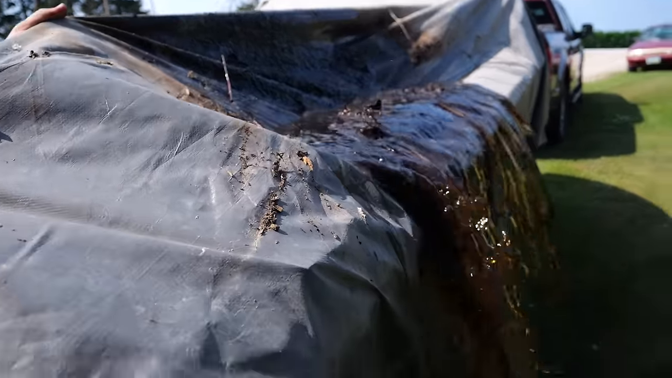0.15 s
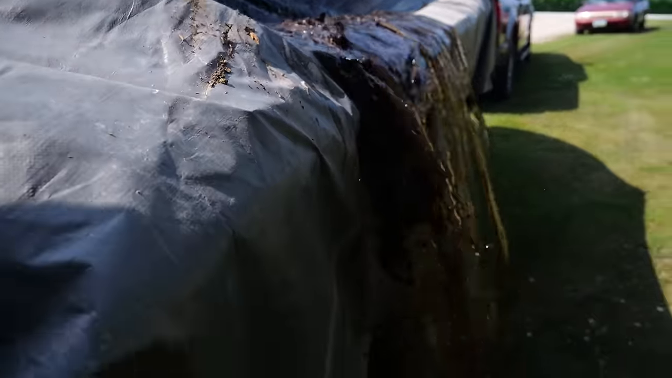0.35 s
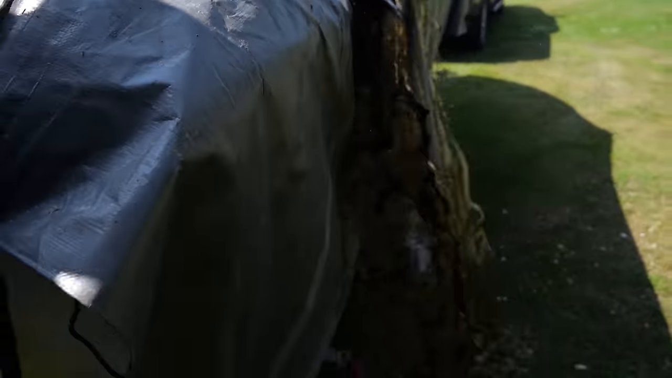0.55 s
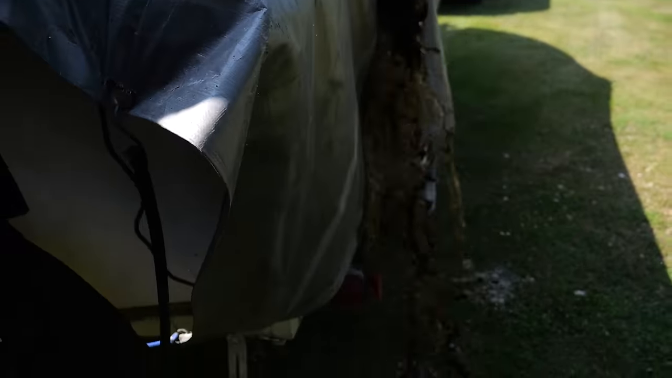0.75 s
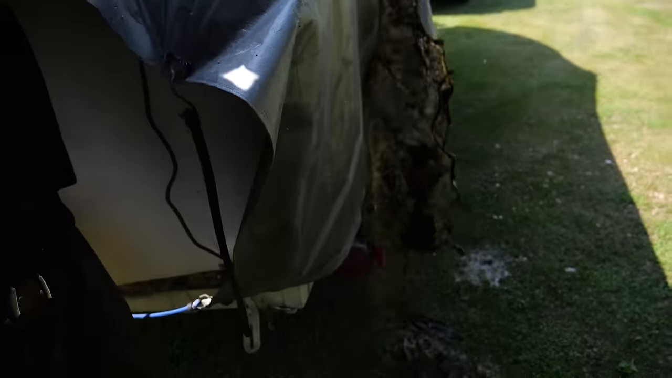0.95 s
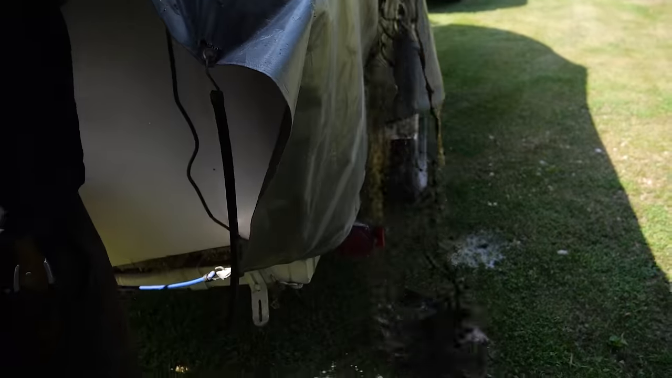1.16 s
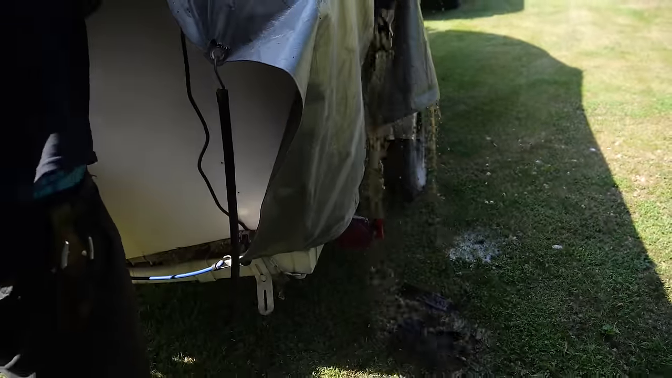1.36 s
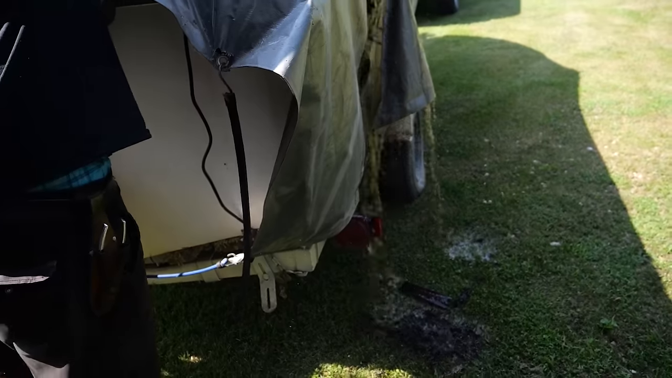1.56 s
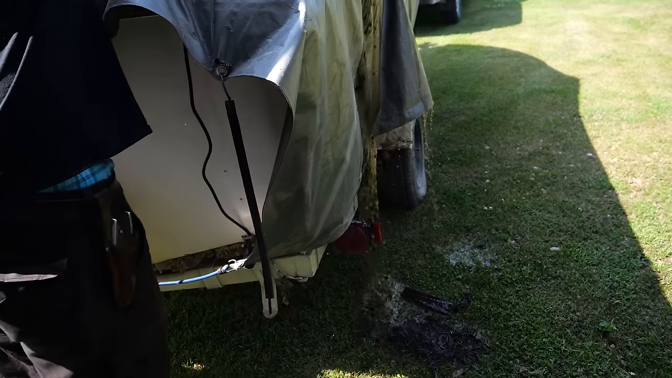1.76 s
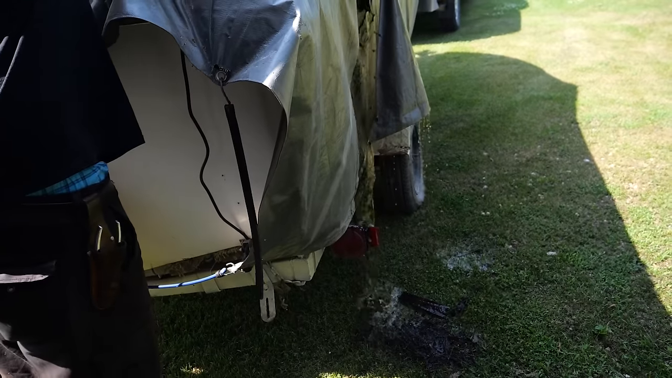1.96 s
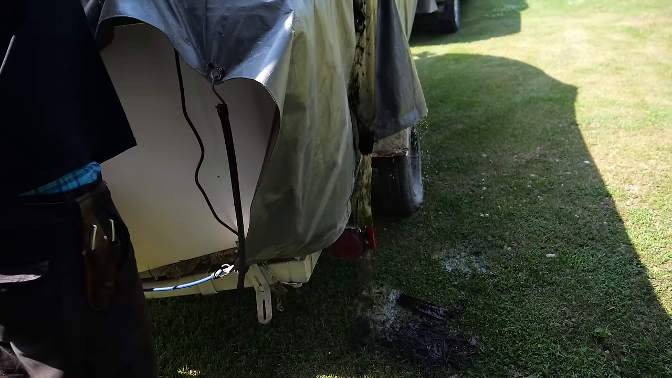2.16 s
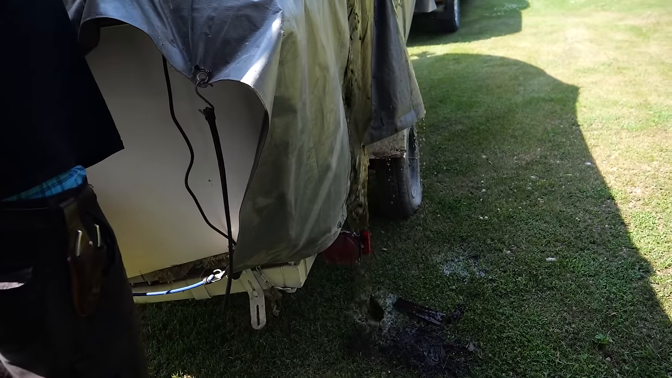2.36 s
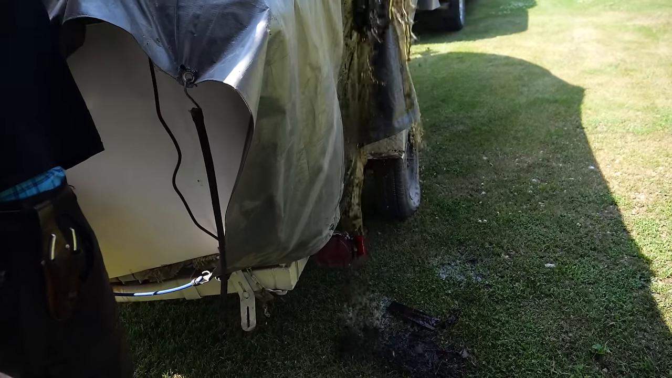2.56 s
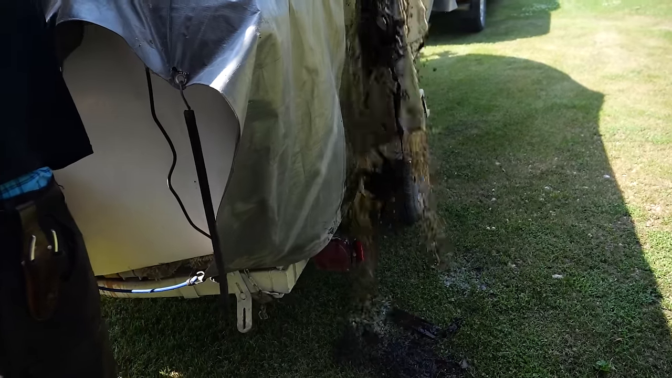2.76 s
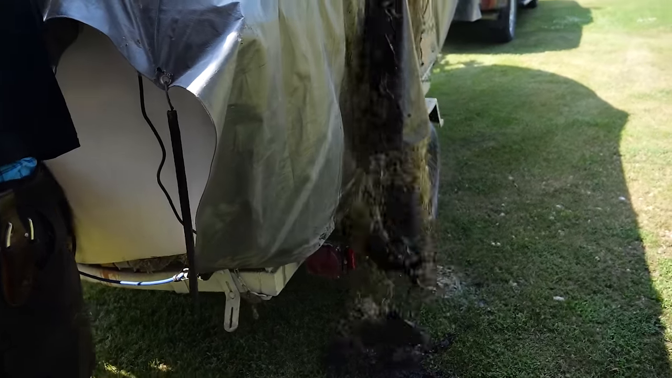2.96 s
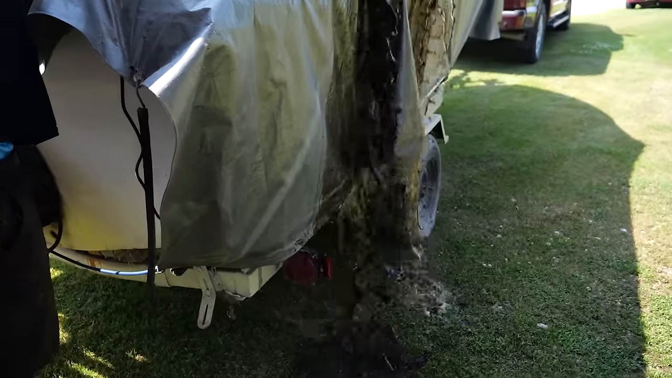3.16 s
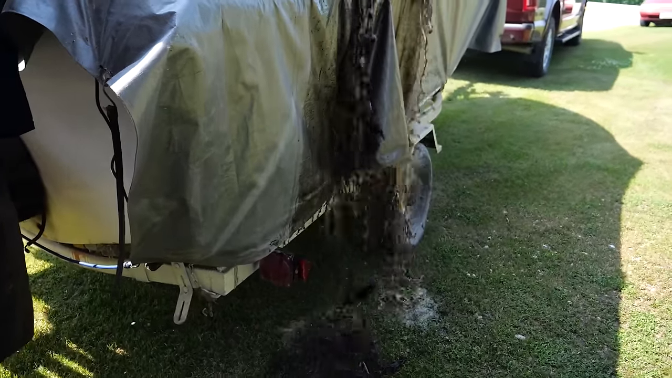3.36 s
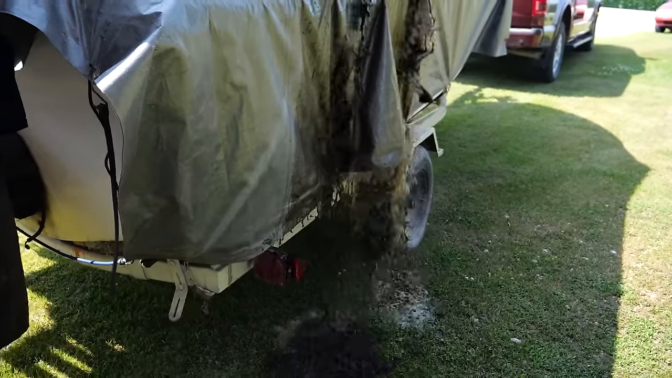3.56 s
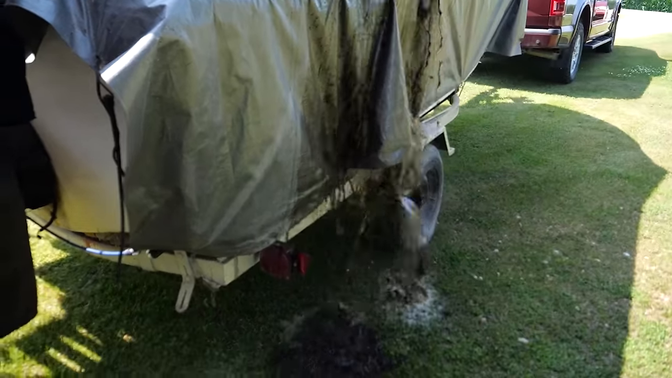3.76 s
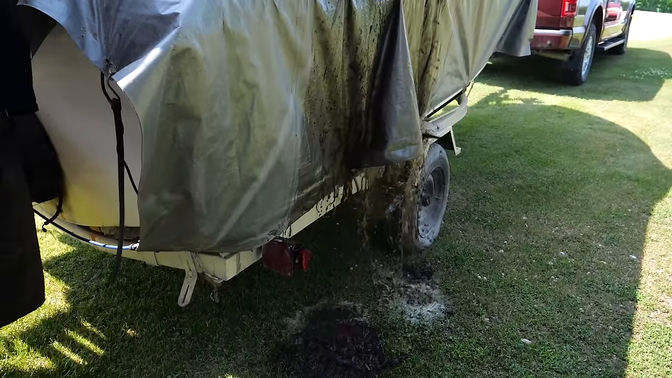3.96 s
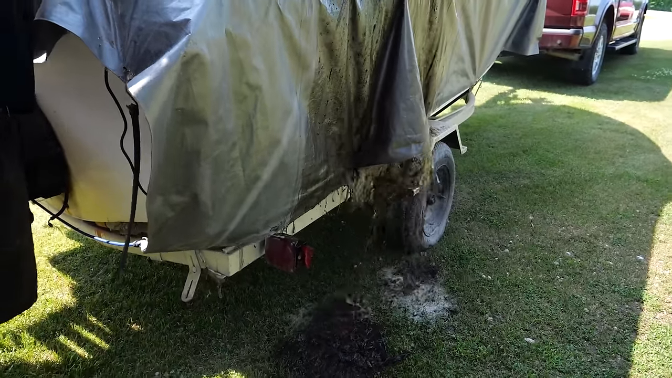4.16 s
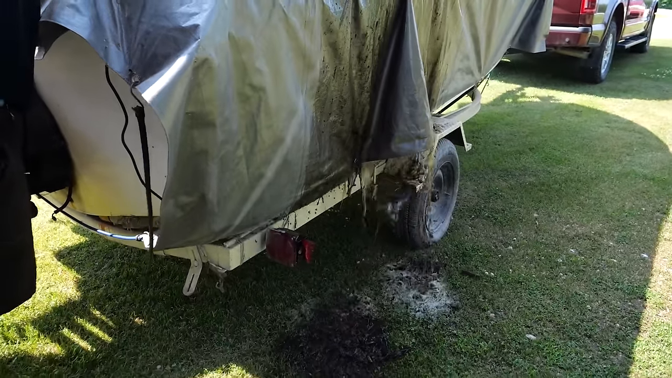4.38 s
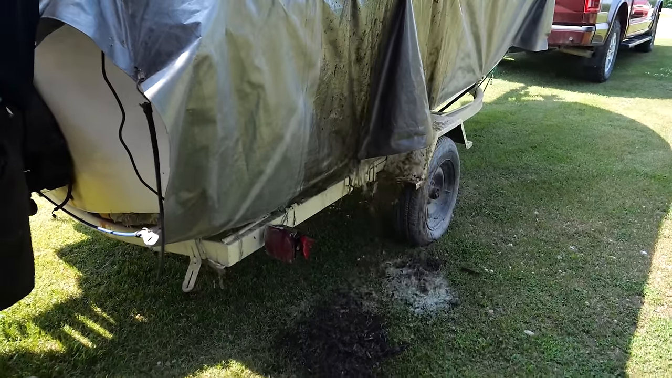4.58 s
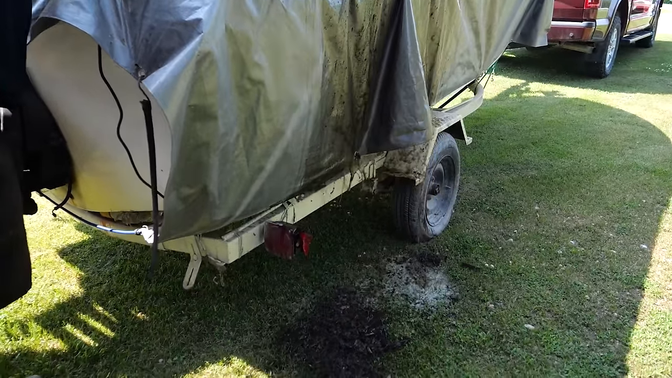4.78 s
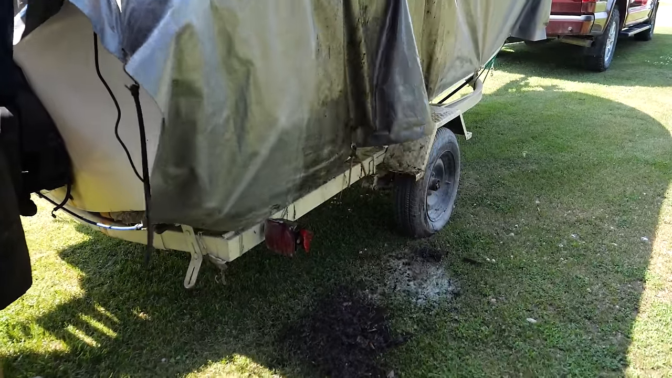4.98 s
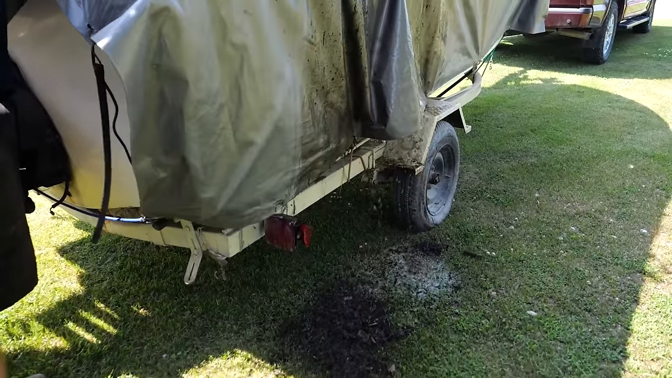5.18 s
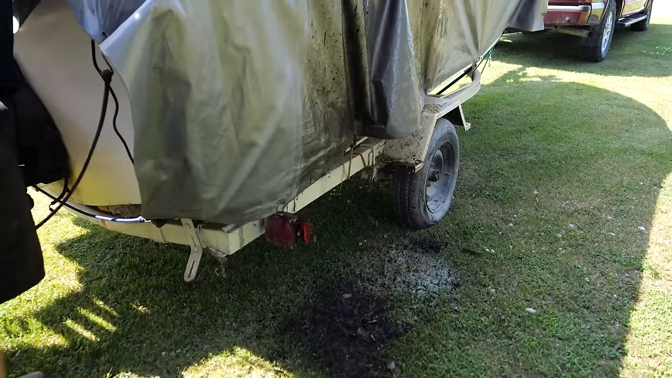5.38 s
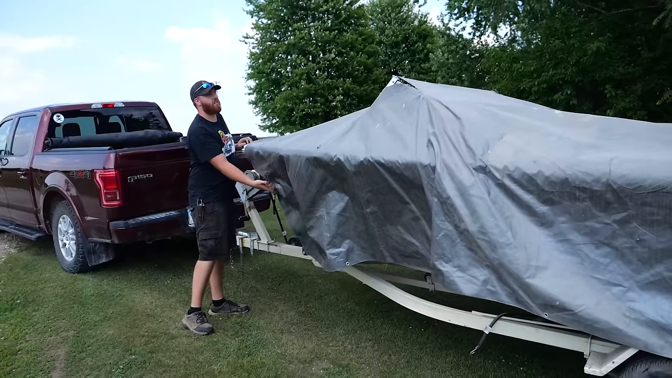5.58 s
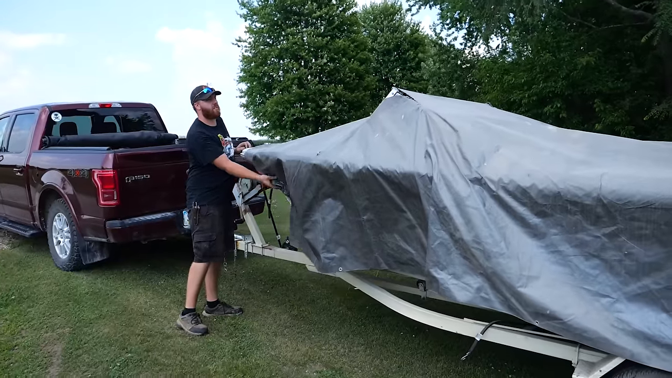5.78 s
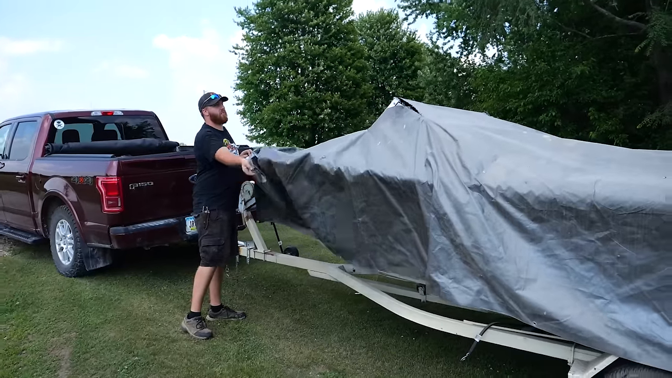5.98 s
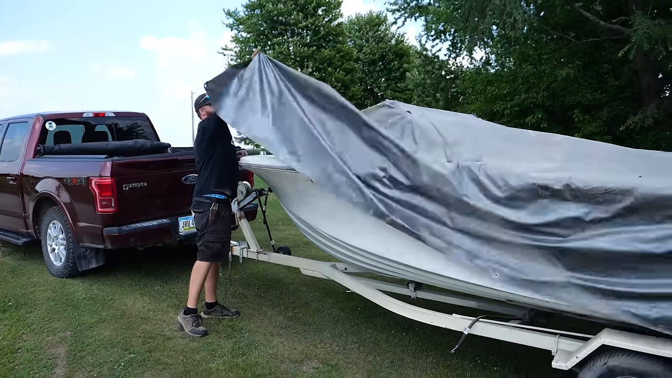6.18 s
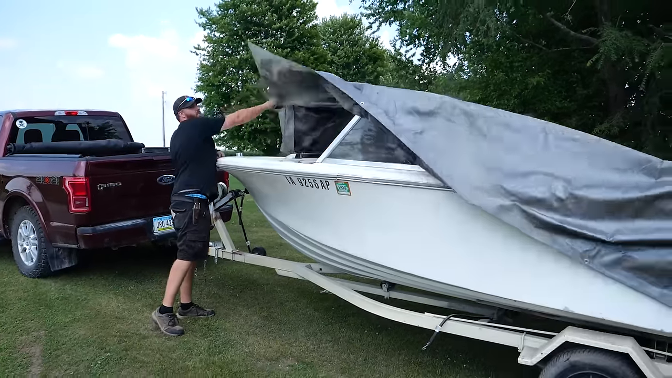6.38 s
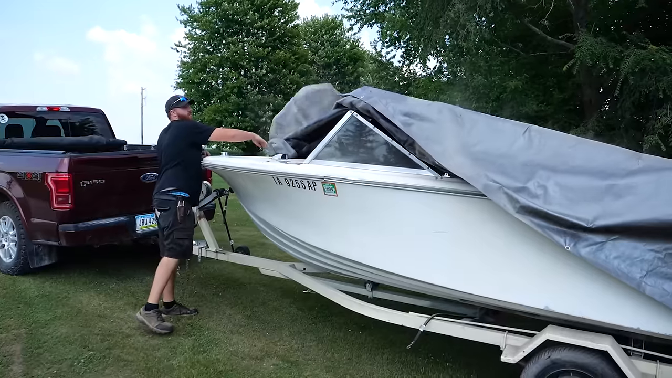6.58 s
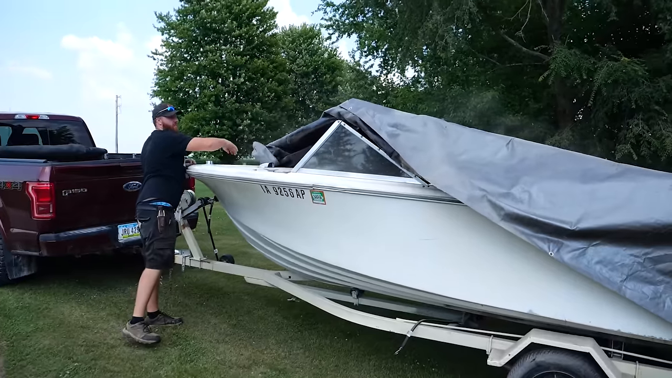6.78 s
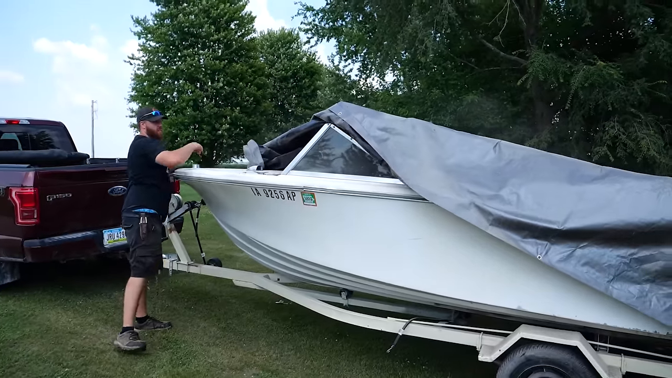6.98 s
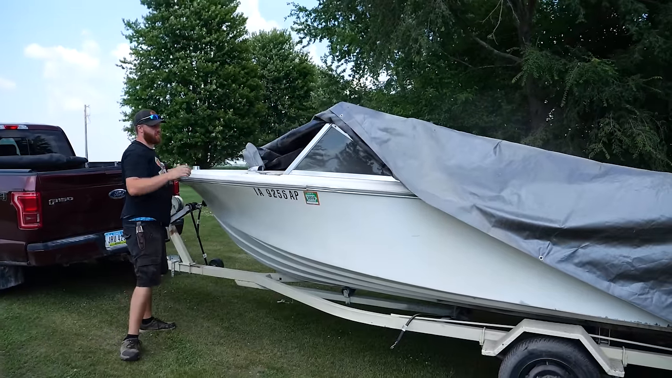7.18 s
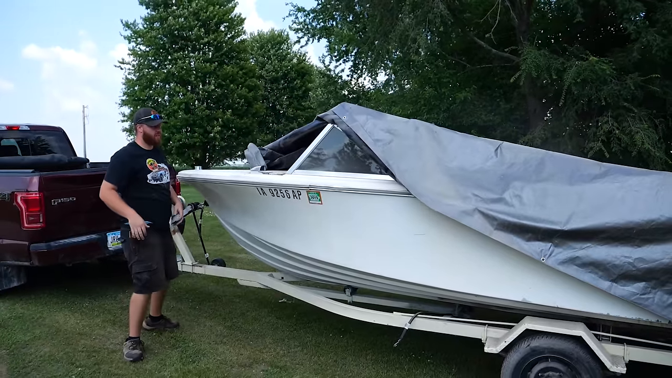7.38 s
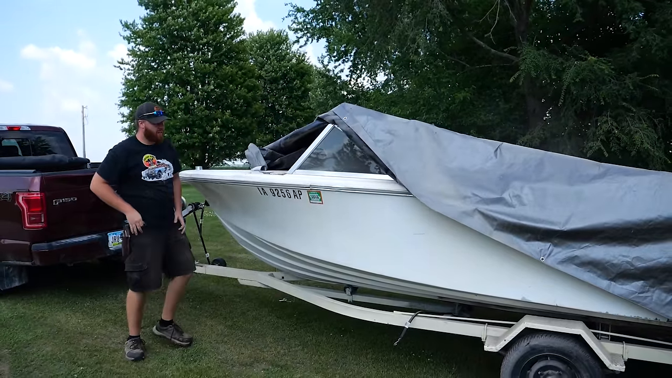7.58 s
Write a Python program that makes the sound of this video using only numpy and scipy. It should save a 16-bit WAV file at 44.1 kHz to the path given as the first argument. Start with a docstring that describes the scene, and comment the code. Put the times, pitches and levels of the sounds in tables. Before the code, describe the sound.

Outdoors, close and almost mono: water runs off a plastic sheet, drumming softly and splattering brightly on grass, with sharp ticks, plinks and dull hollow hull thumps. It ebbs, surges again, then dwindles to drips. The scene cuts abruptly to tarp rustle; a tug grows into one very loud flapping rush, then small crinkles fade.

```python
"""Rain water tipped off a boat tarp

Outdoors, pooled water drums on a plastic sheet and splatters on grass: crackles of damped grains, noise splats.
Drops plink as short rising tones and the hull booms as decaying sines. Then the tarp is tugged, thrown back in
one loud rush and settles with small creases: lower and finer crackles with snaps of noise.
A bird calls faintly as gliding tones; wind rumbles on the microphone as filtered noise; the loudest peaks clip."""
import sys
import numpy as np
from scipy import signal
from scipy.fft import rfft, irfft, next_fast_len
from scipy.io import wavfile
from scipy.ndimage import uniform_filter1d, map_coordinates

SR = 44100
rng = np.random.default_rng(int(sys.argv[2]) if len(sys.argv) > 2 else 0)


def file_out(sig):
    """Save sig as 16-bit WAV at sys.argv[1]."""
    # one column per channel
    cols = np.atleast_2d(sig).T
    # limit, then scale
    lim = np.clip(cols, -1, 1)
    pcm = np.round(lim * 32767).astype(np.int16)
    wavfile.write(sys.argv[1], SR, pcm)


N = 336513
SWITCH_S = 5.472  # steady water layers stop, steady tarp layers start


def amp(db):
    """Linear gain of a level in dB."""
    return 10 ** (np.asarray(db) / 20)


def unit(x):
    """x scaled to rms 1."""
    return x / np.sqrt(np.mean(x ** 2) + 1e-20)


def along(points, hz):
    """Interpolate (hz, value) points on a log frequency axis."""
    point_hz, value = np.transpose(points)
    return np.interp(np.log(hz + 1), np.log(point_hz + 1), value)


def curves(rows):
    """One value per sample for each column after the time."""
    time_s, *columns = np.transpose(rows)
    return [np.interp(np.arange(N) / SR, time_s, column) for column in columns]


def wobble(rate_hz):
    """Smooth random curve with rate_hz knots a second."""
    knots = rng.standard_normal(int(N * rate_hz / SR) + 4)
    return map_coordinates(knots, [np.arange(N) * rate_hz / SR])


def filtered(x, response):
    """x times a response of frequency, zero-padded against wrap-around."""
    size = next_fast_len(len(x.T) + 8192)
    spectrum = rfft(x, size) * response(np.fft.rfftfreq(size, 1 / SR))
    return irfft(spectrum, size)[..., :len(x.T)]


def coloured(x, spectrum):
    """x filtered by a (hz, dB) curve, at rms 1."""
    return unit(filtered(x, lambda hz: amp(along(spectrum, hz))))


def patchy(x, depth_db, bins, frames):
    """Soft random gain patches in pitch and time, as sheet panels or pools of water change shape."""
    z = signal.stft(x, nperseg=512)[2]
    field = uniform_filter1d(rng.standard_normal(z.shape), bins, 0)
    field = uniform_filter1d(field, frames, 1)
    return signal.istft(z * amp(depth_db * unit(field)), nperseg=512)[1][:N]


def crackle(count, mid_hz, spread, cycles, size_db, hiss, clump_db):
    """Damped grains of scattered pitch and size, flattened to an even spectrum, on a bed of hiss."""
    sign = rng.choice([-1, 1], count)
    start = (rng.random(count) * N).astype(int)
    pitch, size = rng.standard_normal((2, count))
    hz = np.clip(mid_hz * np.exp(spread * pitch), 150, 15000)[:, None]
    t = np.arange(320) / SR
    shape = np.sin(2 * np.pi * hz * t) * np.exp(-t * hz / cycles) * np.sqrt(hz / mid_hz)
    shape *= (sign * amp(size_db * np.clip(size, -3, 2.6)))[:, None]
    index = start[:, None] + np.arange(len(t))
    grains = np.bincount(index.ravel(), shape.ravel(), N + len(t))[:N]
    spectrum = rfft(grains)
    mean = np.sqrt(uniform_filter1d(np.abs(spectrum) ** 2, 4001) + 1e-9)
    grains = irfft(spectrum / mean, N)
    mixed = unit(grains) + hiss * rng.standard_normal(N)
    return mixed * amp(clump_db * wobble(70))


def bandpass(centre_hz, width):
    """Response of two cascaded resonances; width is bandwidth over centre."""
    def response(hz):
        damping = 1j * hz * centre_hz * width
        return (damping / (centre_hz ** 2 - hz ** 2 + damping)) ** 2
    return response


def bursts(table, width, slap_hz, slap_width, ragged_db, tail_s, swell, strike):
    """Each event is ragged noise that holds, then dies: a bright band at its own pitch over a low slap."""
    out, t = np.zeros(N + SR), np.arange(SR // 8) / SR
    for start_s, length_s, level_db, slap_db, pitch_hz in table:
        noise = rng.standard_normal((2, len(t)))
        steps = np.repeat(rng.standard_normal(len(t) // 40 + 1), 40)[:len(t)]
        ragged = amp(ragged_db * steps)
        after_s = np.maximum(t - length_s, 0)
        rise = np.minimum(t / (0.00028 + swell * length_s), 1)
        contact = 1 + strike * np.exp(-t / 0.00065)  # first contact is the hardest
        wide = width * (.5 + np.tanh(length_s / 0.0057))  # short: pitched tick; long: broad splat
        bright = (level_db, noise[0], bandpass(pitch_hz, wide), tail_s + 0.25 * length_s)
        slap = (slap_db, noise[1], bandpass(slap_hz, slap_width), 3.1 * tail_s)
        for part_db, raw, response, fade_s in (bright, slap):
            shape = rise * np.exp(-after_s / fade_s) * contact
            puff = filtered(raw * ragged * shape, response)
            puff *= np.sqrt((length_s + 0.0012) * SR) / np.linalg.norm(puff)  # energy follows length
            out[round(start_s * SR):][:len(t)] += amp(part_db) * puff
    return out[:N]


# rumble level before gusts: time_s, rumble_db
WIND_LEVEL = [(0.0, -38.5), (0.4, -37.5), (0.47, -44), (0.61, -28.5), (0.7, -46), (0.78, -30.5),
              (0.98, -41), (2.4, -40), (2.46, -58), (2.55, -33), (2.66, -43), (3.31, -45.5), (3.46, -35.5),
              (3.72, -48), (5.33, -45.5), (5.8, -32.5), (5.84, -42), (7.63, -42.5)]
# wind rumble spectrum: freq_hz, density_db (per Hz, relative)
RUMBLE_SPECTRUM = [(6, -11.5), (14, -1.5), (24, 2.5), (40, -13), (70, -19), (150, -31.5), (300, -55)]
# open-air hiss spectrum: freq_hz, density_db (per Hz, relative)
AIR_SPECTRUM = [(59, -34), (100, 3), (170, 14), (386, 11.5), (1130, -24), (1260, -5), (8980, -9),
                (15600, -39.5)]
GUST_DB = 3.5  # quick chance swings of the rumble


def wind():
    """Slow buffeting of the microphone over the quiet hiss of open air."""
    rumble_db, = curves(WIND_LEVEL)
    rumble = coloured(rng.standard_normal(N), RUMBLE_SPECTRUM)
    rumble *= amp(rumble_db + GUST_DB * wobble(6.4))
    air = coloured(rng.standard_normal(N), AIR_SPECTRUM)
    return rumble + amp(-57.0 + 1.2 * wobble(2.5)) * air


# chirps: start_s, length_s, first_hz, last_hz, level_db (of the tone before smearing)
BIRD_CHIRPS = [(5.587, 0.083, 2650, 3180, -55), (5.755, .035, 4700, 4670, -47),
               (6.795, .065, 3070, 3110, -55), (6.872, 0.099, 2660, 2650, -62),
               (6.97, .03, 2380, 2390, -55), (6.99, .11, 2620, 2580, -64)]


def bird():
    """Faint far chirps: a gliding tone smeared by foliage into a narrow band of noise."""
    out, t = np.zeros(N), np.arange(N) / SR
    for start_s, length_s, first_hz, last_hz, level_db in BIRD_CHIRPS:
        end_s = start_s + length_s
        edge = np.clip(np.minimum(t - start_s, end_s - t) / 0.011, 0, 1)
        glide_hz = np.interp(t, [start_s, end_s], [first_hz, last_hz])
        phase = 2 * np.pi * np.cumsum(glide_hz) / SR
        smeared = (1 + 1.1 * wobble(260)) * np.sin(phase) + 1.2 * wobble(260) * np.cos(phase)
        out += amp(level_db) * edge * smeared
    return out


# hull booms: start_s, level_db (at start, before the soft attack), pitch_hz, t60_s
HULL_THUDS = [(1.239, -34, 172, 0.17), (1.659, -35, 168, 0.24), (2.37, -24.5, 163, 0.11),
              (2.468, -35.5, 146, 0.14)]


def hull():
    """Short soft booms of the hollow boat: decaying sines."""
    out, t = np.zeros(N + SR), np.arange(SR // 3) / SR
    for start_s, level_db, pitch_hz, t60_s in HULL_THUDS:
        attack = 1 - np.exp(-t / 0.0054)
        boom = amp(level_db - 60 * t / t60_s) * attack * np.sin(2 * np.pi * pitch_hz * t)
        out[round(start_s * SR):][:len(t)] += boom
    return out[:N]


# fat drops into the puddle: start_s, peak_db, start_hz, decay_cycles
PUDDLE_PLOPS = [(0.133, -35, 603, 3.1), (0.257, -30, 470, 2.4), (0.289, -32, 1020, 4.5),
                (0.461, -18.5, 1560, 2.6), (0.481, -26, 500, 2.4), (1.191, -16, 1770, 3.8),
                (2.284, -34, 1020, 4.1), (2.567, -32, 1680, 4.5), (3.877, -20, 1760, 4),
                (4.093, -27, 690, 4), (4.114, -21, 1770, 3.5), (4.459, -25, 1710, 3),
                (4.52, -23, 1720, 3.5), (4.593, -23, 950, 2.2), (4.625, -26.5, 935, 3.9),
                (4.664, -24.5, 1530, 4.5), (5.454, -27, 693, 4.5), (1.008, -20, 520, 2.2),
                (4.955, -22.5, 260, 1.3)]
# single hard drops: start_s, peak_db, start_hz
HARD_TICKS = [(0.7874, -5, 8430), (0.84, -4, 8910), (0.8984, -8, 7950), (0.9334, -9, 5430),
              (1.048, -8, 7780), (1.269, -7, 7850), (1.4007, -5, 5200), (1.4865, -6, 7560),
              (1.7924, -8, 3360), (2.0128, -13, 8510), (2.0911, -18, 8760), (2.1061, -15, 8140),
              (2.1964, -22, 2600), (2.4354, -17, 8400), (3.0634, -11, 2960), (3.1882, -7, 7090),
              (3.3548, -6, 8510), (3.3734, -11, 5650), (3.4501, -8, 4230), (3.6047, -11, 5920),
              (3.6754, -10, 8340), (3.895, -8, 8120), (4.118, -2, 7220), (4.2158, -11, 2370),
              (4.4884, -17, 2730), (4.6927, -16, 6140), (4.8229, -19, 8590), (5.1522, -21, 8020)]
TICK_DECAY_CYCLES = 1.9


def plops():
    """A trapped bubble rings for a few cycles while its pitch rises; a hard drop is mostly gone in less."""
    out, t = np.zeros(N + SR), np.arange(SR // 20) / SR
    ticks = [(*tick, TICK_DECAY_CYCLES) for tick in HARD_TICKS]
    for start_s, peak_db, start_hz, decay_cycles in [*PUDDLE_PLOPS, *ticks]:
        turns = start_hz * t * (1 + 0.027 * start_hz * t / decay_cycles)
        envelope = (1 - np.exp(-4 * start_hz * t)) * np.exp(-start_hz * t / decay_cycles)
        ring = envelope * np.sin(2 * np.pi * turns)
        out[round(start_s * SR):][:len(t)] += amp(peak_db) * ring / np.abs(ring).max()
    return out[:N]


# rise and fall are time constants
SHAKE_S, SHAKE_HOLD_S, SHAKE_RISE_S, SHAKE_FALL_S = 4.99, .075, .028, 0.021
SHAKE_DRUM_DB, SHAKE_FLAP_DB, SHAKE_SPRAY_DB, SHAKE_CREASE_DB = -28, -22, -34, -30


def shake(peak_db):
    """Gain of one jerk of the wet sheet: it swells, holds and dies."""
    t = np.arange(N) / SR - SHAKE_S
    rise = np.minimum(t, 0) / SHAKE_RISE_S
    fall = np.maximum(t - SHAKE_HOLD_S, 0) / SHAKE_FALL_S
    return amp(peak_db) * np.exp(rise - fall)


# pour levels: time_s, splatter_db, drum_db (drumming on the wet sheet)
POUR_LEVELS = [(0, -57, -44.5), (.36, -51.5, -47), (.4, -49, -48.5), (.416, -33, -41), (.46, -28, -33),
               (.6, -22.5, -34), (.8, -22, -33.5), (1.28, -24.5, -38.5), (1.7, -31.5, -45),
               (2.17, -35.5, -47.5), (2.72, -34.5, -45.5), (2.89, -26, -39.5), (3.17, -24.5, -35),
               (3.77, -26, -40.5), (4.26, -31, -41), (4.6, -33.5, -39.5), (4.87, -36, -48),
               (4.91, -36, -35.5), (5.14, -42, -36.5), (5.47, -40.5, -40)]
DRIP_S, DRIP_HZ = 0.00067, 5200  # medians
DRIP_OVER_DB, DRIP_SLAP_DB, DRIP_SCATTER_DB = 2.5, -7, 2.5  # over splatter, slap over drip, spread


def drips(count):
    """Burst rows for stray drips at chance moments, their levels following the splatter around them."""
    luck = rng.standard_normal((count, 3))
    start_s = SWITCH_S * rng.random(count)
    splatter_db = curves(POUR_LEVELS)[0][(start_s * SR).astype(int)]
    level_db = splatter_db + DRIP_OVER_DB + DRIP_SCATTER_DB * luck[:, 0]
    length_s = DRIP_S * np.exp(.4 * luck[:, 1])
    pitch_hz = DRIP_HZ * np.exp(0.23 * luck[:, 2])
    return np.transpose([start_s, length_s, level_db, level_db + DRIP_SLAP_DB, pitch_hz])


# water slugs: start_s, length_s, spray_db, slap_db, spray_hz
WATER_SPLATS = [(.0746, .0036, -44.5, -70, 5750), (.1434, 0.0087, -49.5, -43.5, 3730),
                (.2982, .0046, -46, -52, 4610), (.458, .012, -44, -28.5, 3020),
                (.4803, .0016, -22, -48, 5910), (.9177, 0.012, -23, -22.5, 3940),
                (.972, .002, -32, -19, 4000), (.9997, .003, -32, -21, 4010),
                (1.1548, .014, -24, -20.5, 5640), (1.1715, .003, -19.5, -28, 3750),
                (1.2215, 0.022, -21.5, -28.5, 5400), (1.3806, .0024, -24, -24.5, 5860),
                (1.4013, 0.0028, -19, -23, 4800), (1.4595, .0043, -24, -30, 3520),
                (1.4873, .0025, -29, -26.5, 6900), (1.637, .007, -31, -33, 5340),
                (1.7334, 0.0065, -24.5, -32.5, 6050), (1.7764, .0078, -24, -29, 5600),
                (2.1665, 0.0026, -27, -28, 6740), (2.3297, 0.012, -29, -32.5, 5750),
                (2.3468, .0094, -22, -22.5, 3170), (2.4366, 0.003, -27.5, -50, 6240),
                (2.4743, 0.0062, -24, -28, 4940), (2.8652, .001, -26.5, -36, 6660),
                (2.977, 0.016, -19.5, -20.5, 5100), (3.11, .017, -17.5, -15, 3000),
                (3.3235, .0017, -23, -21, 4760), (3.495, .011, -20.5, -24, 4750),
                (3.564, 0.0092, -24, -25.5, 4730), (3.6068, .0018, -27, -33, 6750),
                (3.927, .01, -21.5, -24.5, 5250), (4.2164, 0.011, -30, -33, 3940),
                (4.3213, 0.011, -44, -31, 4850), (4.71, .0037, -30, -51, 5850),
                (5.1746, .0039, -34, -60, 3610), (5.2171, 0.0045, -40.5, -31, 3560),
                (5.3004, .0014, -32, -48, 4610), (5.3882, .002, -31.5, -60, 4400)]
# splatter on grass: freq_hz, density_db (per Hz, relative)
SPRAY_SPECTRUM = [(530, -30), (900, -9.5), (1380, -1.5), (1950, -0.5), (2120, -1.5), (2510, -1.5),
                  (4950, 0), (6670, -3), (8670, 2), (10400, -10.5), (14100, -6), (15600, -17)]
# drumming on the wet sheet: freq_hz, density_db (per Hz, relative)
WET_SHEET_SPECTRUM = [(50, -22), (85, -9.5), (120, -6.5), (210, -4.5), (500, -7.5), (950, -5), (1800, -12),
                      (4000, -16), (6000, -41)]


def water():
    """Drops burst on the grass, bubbles plink in the puddle, the stream drums on the sheet, big slugs splat."""
    spray_db, drum_db = curves(POUR_LEVELS)
    spray = crackle(count=30000, mid_hz=4480, spread=0.688, cycles=1.5, size_db=4.5, hiss=0.95, clump_db=1.4)
    plink = crackle(count=2500, mid_hz=3222, spread=0.603, cycles=3, size_db=4.5, hiss=0.05, clump_db=2.9)
    spray = unit(spray) + amp(-8.5) * unit(plink)
    spray = coloured(patchy(spray, depth_db=1.5, bins=8, frames=6), SPRAY_SPECTRUM)
    drum = crackle(count=7000, mid_hz=909, spread=0.665, cycles=2.06, size_db=5.0, hiss=0.78, clump_db=1.0)
    drum = coloured(patchy(drum, depth_db=2.0, bins=3, frames=6), WET_SHEET_SPECTRUM)
    splats = bursts([*WATER_SPLATS, *drips(count=90)], width=1.02, slap_hz=1400, slap_width=1.6,
                    ragged_db=4.0, tail_s=0.0015, swell=.12, strike=2.5)
    pouring = np.arange(N) < SWITCH_S * SR
    bed = (amp(spray_db) + shake(SHAKE_SPRAY_DB)) * spray
    bed += (amp(drum_db) + shake(SHAKE_DRUM_DB)) * drum
    return pouring * bed + splats


# throw levels: time_s, sheet_db, crease_db
THROW_LEVELS = [(5.48, -42, -52), (5.54, -48.5, -58), (5.75, -51.5, -49), (5.776, -30, -39),
                (5.8, -35, -41.5), (5.87, -36, -41), (5.95, -31, -42), (6.04, -20.5, -34), (6.12, -20, -30),
                (6.145, -16, -25), (6.16, -17, -24), (6.17, -7.5, -17.5), (6.235, -7, -14.5),
                (6.3, -7, -21), (6.335, -14.5, -24.5), (6.375, -14, -23.5), (6.45, -27, -38),
                (6.58, -34.5, -42), (6.73, -44.5, -46.5), (6.93, -46, -55), (7.03, -56.5, -64),
                (7.39, -52, -60), (7.51, -45, -53.5), (7.63, -67, -85)]
# snaps of the sheet: start_s, length_s, crack_db, slap_db, crack_hz
SHEET_SNAPS = [(5.4995, 0.00062, -28, -40, 5060), (5.5005, .005, -28.5, -35, 1100),
               (5.5194, .011, -39, -60, 1680), (5.5411, .0049, -45, -41, 1780),
               (5.553, .0035, -42, -40, 1440), (5.7769, 0.01, -32, -45, 780),
               (5.8241, .0052, -33, -29, 1510), (5.8815, 0.00088, -25.5, -45, 4020),
               (5.885, .008, -28.5, -42, 1400), (5.9145, .005, -34, -49, 1760),
               (6.0391, .0018, -22, -50, 1570), (6.0915, .0015, -22, -47, 1330),
               (6.1423, 0.0089, -15, -30, 1530), (6.2258, 0.002, -5, -16, 1470),
               (6.3626, .008, -14, -33, 2300), (6.4589, .0037, -32, -49, 1900),
               (6.6341, 0.012, -42, -37, 1900), (6.682, 0.011, -60, -37.5, 1300),
               (6.74, .006, -60, -37, 1300), (6.79, 0.0079, -58, -38, 1500),
               (6.8719, 0.0022, -43, -34.5, 1940), (7.0669, .0046, -50, -40.5, 1460),
               (7.12, 0.0037, -36, -43, 1400), (7.1815, .0039, -47, -42.5, 1480),
               (7.2648, 0.0034, -41, -41, 1480), (7.319, .0028, -45, -35.5, 1800),
               (7.3878, .0017, -45, -51, 1330), (7.4256, 0.002, -55, -32.5, 1280),
               (7.4768, .0032, -45, -38, 1780), (7.5054, .0016, -50, -45, 1470),
               (7.6169, .005, -65, -41, 1330)]
# flapping sheet, folds ring near 800 and 1500 Hz: freq_hz, density_db (per Hz, relative)
SHEET_SPECTRUM = [(60, -15.5), (110, -18), (190, -18), (240, -10), (400, -6.5), (600, -2), (800, -1.5),
                  (1150, -4), (1500, -5.5), (2300, -14.5), (4000, -21), (6000, -39)]
# buckling creases: freq_hz, density_db (per Hz, relative)
CREASE_SPECTRUM = [(1180, -19.5), (2000, -8.5), (2700, -12.5), (3520, -13.5), (5370, -17.5), (8530, -20),
                   (13700, -40.5), (15600, -38.5)]


def tarp():
    """The sheet flaps and booms; its creases buckle in a finer, brighter crackle."""
    sheet_db, crease_db = curves(THROW_LEVELS)
    sheet = crackle(count=9000, mid_hz=806, spread=0.747, cycles=6.4, size_db=3.0, hiss=0.72, clump_db=1.5)
    sheet = coloured(patchy(sheet, depth_db=2.0, bins=2, frames=14), SHEET_SPECTRUM)
    crease = crackle(count=20000, mid_hz=4150, spread=0.53, cycles=0.8, size_db=0.5, hiss=1.0, clump_db=1.5)
    crease = coloured(crease, CREASE_SPECTRUM)
    snaps = bursts(SHEET_SNAPS, width=0.76, slap_hz=530, slap_width=1.16,
                   ragged_db=4.5, tail_s=0.0018, swell=0.054, strike=4.1)
    thrown = np.arange(N) >= SWITCH_S * SR
    throw = thrown * (amp(sheet_db) * sheet + amp(crease_db) * crease)
    jerk = shake(SHAKE_FLAP_DB) * sheet + shake(SHAKE_CREASE_DB) * crease
    return throw + jerk + snaps


# stereo width: freq_hz, side_over_mid_db
SIDE_LEVEL = [(60, -35), (110, -27), (200, -22.5), (380, -26), (700, -31), (1290, -30), (2380, -27.5),
              (4400, -24.5), (8120, -21.5), (15000, -18)]


def scene():
    """Almost mono: the side follows the middle moment by moment, weak and with unrelated phases."""
    mid = wind() + bird() + hull() + plops() + water() + tarp()
    hz, _, z = signal.stft(mid, SR, nperseg=512)
    z = z * np.exp(2j * np.pi * rng.random(z.shape)) * amp(along(SIDE_LEVEL, hz))[:, None]
    side = signal.istft(z, SR, nperseg=512)[1][:N]
    side += amp(-62.5) * rng.standard_normal(N)  # faint hiss, opposite in the two channels
    return np.array([mid + side, mid - side])


TOP_HZ = 15700  # band limit


def record(dry):
    """Overload flattens the loudest peaks near full scale; nothing is kept above the band limit."""
    clipped = dry / (1 + np.abs(dry / .94) ** 10) ** (1 / 10)
    return filtered(clipped, lambda hz: hz < TOP_HZ)


dry = scene()
out = record(dry)
file_out(out)
```